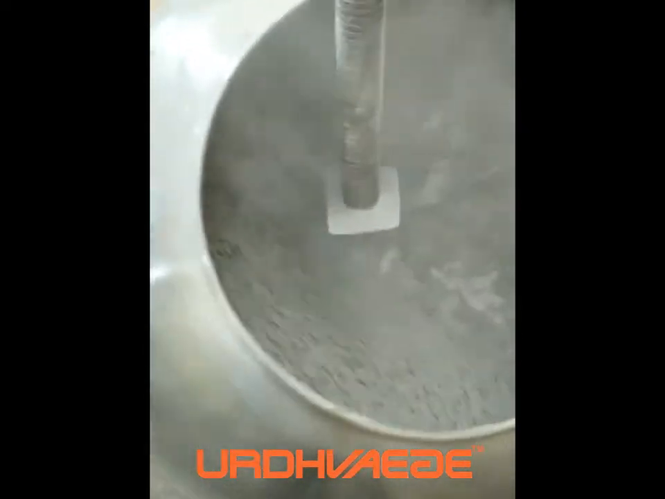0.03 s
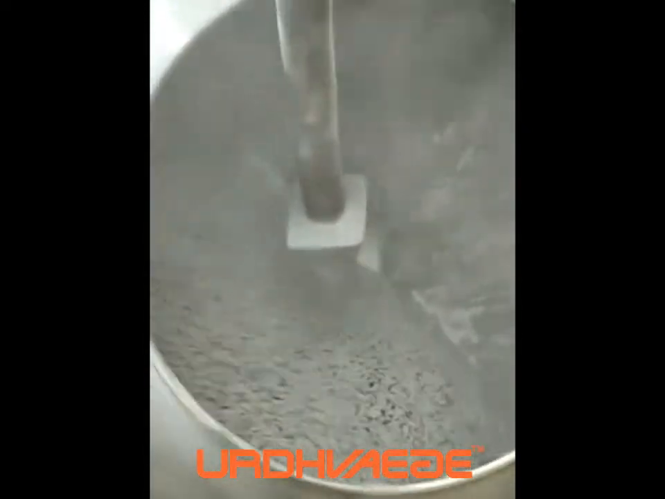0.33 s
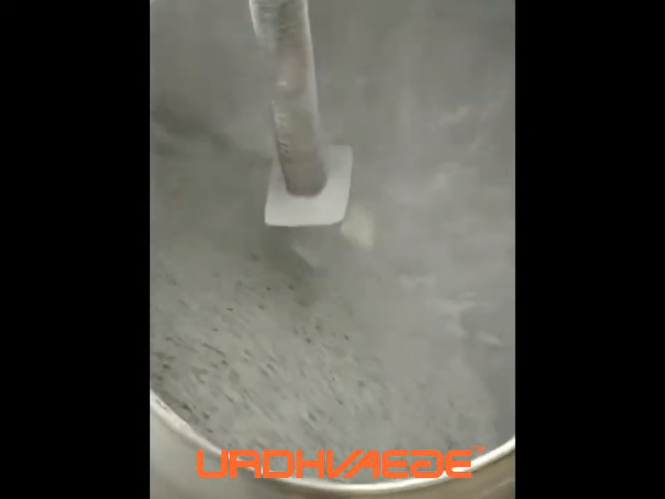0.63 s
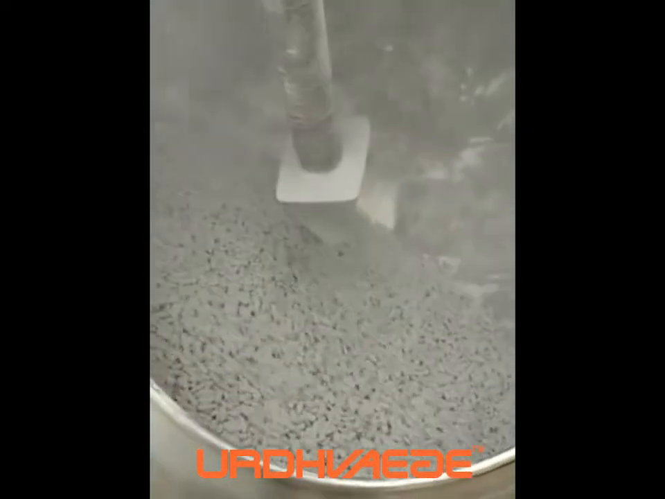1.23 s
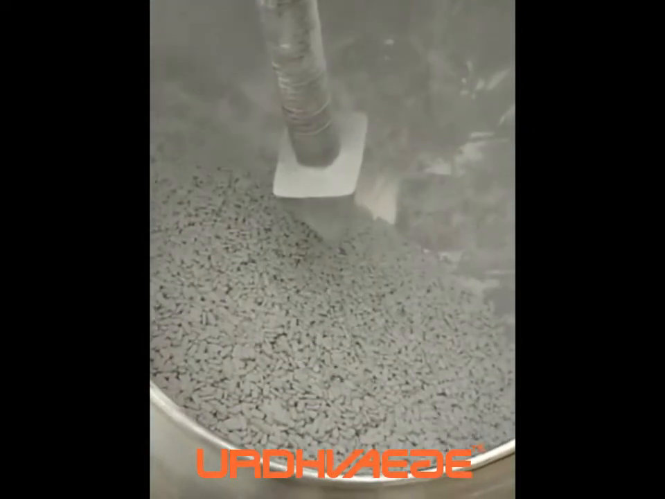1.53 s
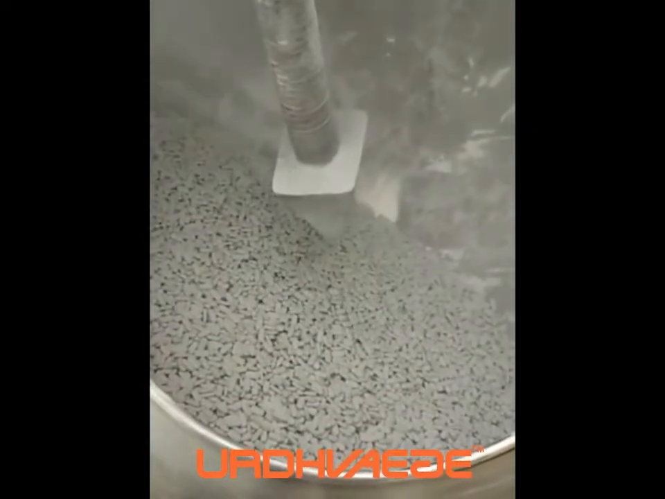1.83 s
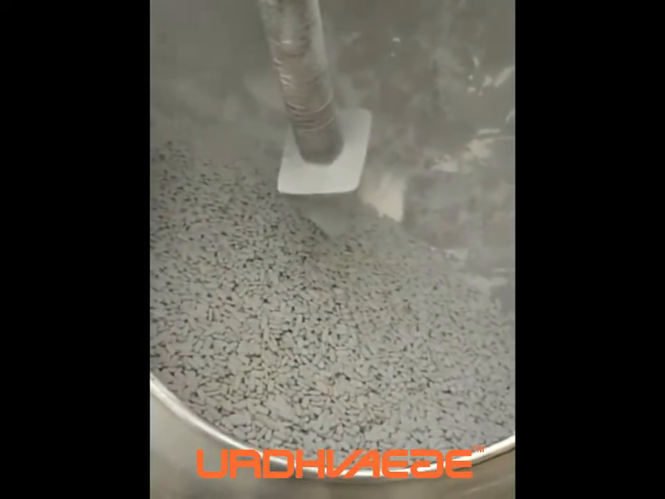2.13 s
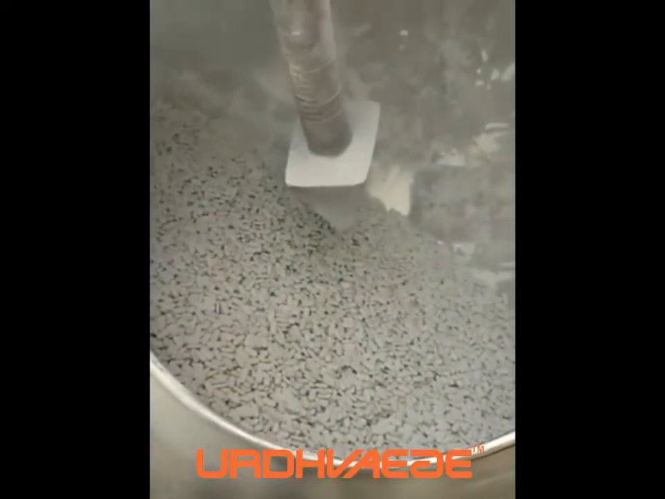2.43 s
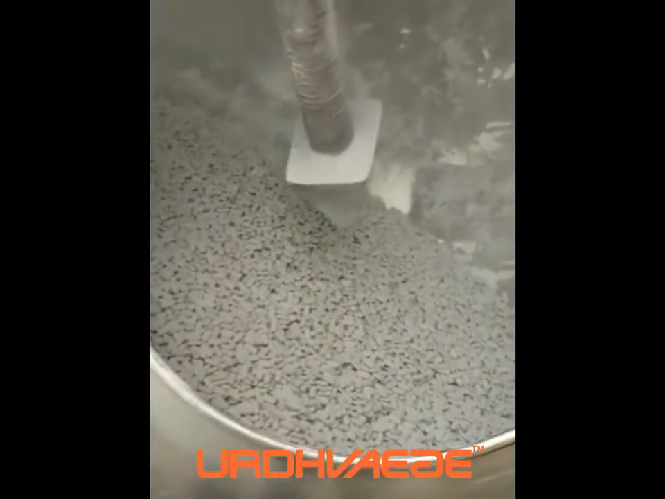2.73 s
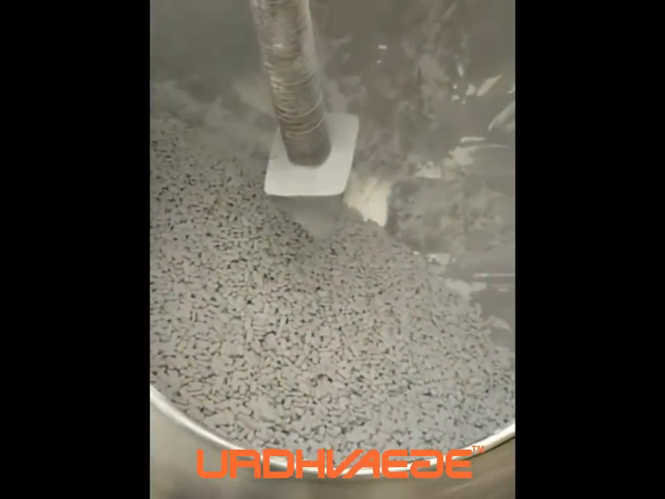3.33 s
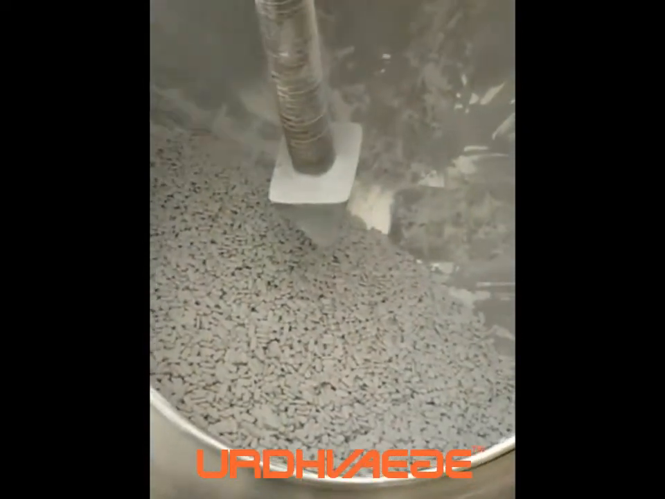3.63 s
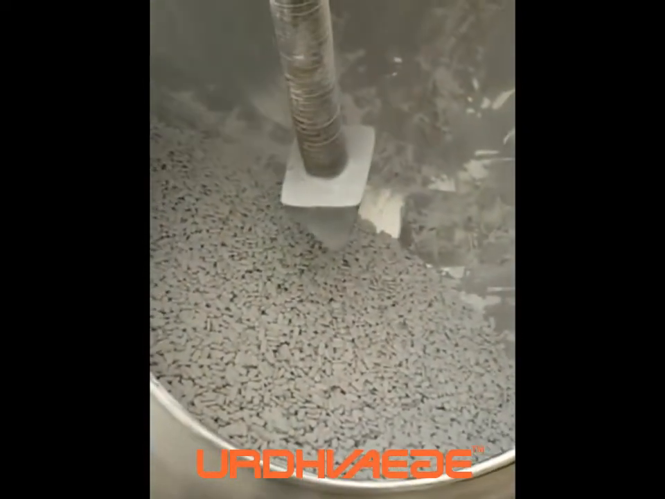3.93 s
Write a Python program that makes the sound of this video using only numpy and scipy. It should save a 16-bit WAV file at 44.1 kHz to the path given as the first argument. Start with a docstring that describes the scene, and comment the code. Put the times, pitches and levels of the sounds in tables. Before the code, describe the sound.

Steady hum and blower drone of a turning pan machine, pellets tumbling, spray hissing at first.

```python
"""A factory, at the mouth of a turning steel coating pan. The motor hums, the belt drive throbs,
a blower drones and its ducts rumble. Tumbling pellets rustle and excite the drum's air resonances.
A spray jet hisses into the pan for the first second and spits once more near the end.
At first the microphone moves in over the rim, where the air sounds hollow."""
import sys
import numpy as np
from scipy.fft import rfft, irfft, next_fast_len
from scipy.io import wavfile
from scipy.ndimage import map_coordinates

SR = 44100
rng = np.random.default_rng(int(sys.argv[2]) if len(sys.argv) > 2 else 0)


def store_pcm(level_fs):
    """Save levels as 16-bit WAV."""
    pcm = np.round(np.clip(level_fs, -1, 1) * 32767).astype(np.int16)
    wavfile.write(sys.argv[1], SR, np.atleast_2d(pcm).T)


N = 176400


def amp(db):
    """Decibels to gain."""
    return 10 ** (np.asarray(db) / 20)


def unit(x):
    """Scale to rms 1."""
    return x / np.sqrt(np.mean(x ** 2) + 1e-20)


def seconds():
    """Time of each sample."""
    return np.arange(N) / SR


def along(points, hz):
    """Interpolate (freq_hz, value) points on a log axis."""
    freq_hz, values = np.transpose(points)
    return np.interp(np.log(hz + 1), np.log(freq_hz + 1), values)


def curve(points):
    """Interpolate (time_s, value) points per sample."""
    return np.interp(seconds(), *np.transpose(points))


def wobble(rate_hz):
    """Smooth random curve, rate_hz knots a second."""
    return map_coordinates(rng.standard_normal(512), [seconds() * rate_hz], mode="mirror")


def bump(crest_s, sigma_s):
    """Gaussian envelope, peak 1."""
    return np.exp(-((seconds() - crest_s) / sigma_s) ** 2 / 2)


def filtered(x, response):
    """Apply a frequency response by FFT."""
    size = next_fast_len(N + SR // 2)
    return irfft(rfft(x, size) * response(np.fft.rfftfreq(size, 1 / SR)), size)[..., :N]


def resonance(f, centre_hz, width_hz):
    """Squared band-pass response: steep skirts."""
    return np.abs(f * width_hz / (centre_hz ** 2 - f * f + 1j * f * width_hz)) ** 2


def spread(pair, colour):
    """Two independent signals to a coloured stereo field, rms 1: bass alike, treble diffuse."""
    # left-right likeness: freq_hz, correlation
    likeness = [(90, 1), (200, 0.89), (380, 0.8), (480, 0.16), (650, 0.7), (850, 0.41), (1300, -0.2),
                (2000, 0.086), (4000, -0.023)]

    def mid_side_gains(f):
        angle = np.arccos(np.clip(along(likeness, f), -1, 1)) / 2
        return colour(f) * np.array([np.cos(angle), np.sin(angle)])

    mid, side = filtered(pair, mid_side_gains)
    return unit(np.array([mid + side, mid - side]))


def white():
    """Two independent white noises."""
    return rng.standard_normal((2, N))


def shaped(pair, spectrum):
    """Stereo field with a (freq_hz, density_db) spectrum, rms 1."""
    return spread(pair, lambda f: amp(along(spectrum, f)))


def tone(hz, stereo_rad, wander_hz=0.15):
    """Slightly unsteady sine, rms 1, with stereo_rad of phase between the ears."""
    phase = 2 * np.pi * (np.cumsum(hz + wander_hz * wobble(12)) / SR + rng.random())
    return np.sqrt(2) * np.sin(phase + np.array([[stereo_rad], [-stereo_rad]]) / 2)


def impacts(per_s, scatter_db):
    """Two independent streams of tiny random impacts, rms 1."""
    hits = rng.random((2, N)) < per_s / SR
    size = amp(scatter_db * np.clip(rng.standard_normal((2, N)), -2, 2))
    return unit(hits * np.sign(rng.standard_normal((2, N))) * size)


def rim_shadow():
    """Gain on tones that the rim screens until the microphone has moved in."""
    start_db, decay_s = -4.5, 0.38
    return amp(start_db * np.exp(-seconds() / decay_s))


def sizzle():
    """A faint, uneven high sizzle comes and goes once."""
    # sizzle spectrum: freq_hz, density_db
    spectrum = [(8000, -23), (10500, -4.5), (11500, 3), (12500, -11), (15500, -18)]
    return amp(-70 + 2 * wobble(20)) * bump(crest_s=2.75, sigma_s=0.2) * shaped(white(), spectrum)


def air_swells():
    """Hollow bands of air noise come and go in the pan's mouth."""
    # air swells: crest_s, sigma_s, centre_hz, width_hz, level_db
    swells = [(0.033, 0.033, 133, 45, -24.5), (0.158, 0.039, 133, 37, -23), (0.137, 0.0264, 267, 80, -22.5),
              (0.094, 0.19, 642, 172, -28), (0.146, 0.068, 814, 170, -29), (0.325, 0.12, 420, 120, -27),
              (0.368, .04, 1030, 300, -31), (.55, .03, 350, 50, -26), (0.6, 0.21, 450, 150, -30.5),
              (3.304, 0.089, 936, 81, -31), (3.82, 0.13, 906, 52, -37.5), (3.89, 0.045, 370, 74, -25.5)]
    band = lambda hz, width_hz: spread(white(), lambda f: resonance(f, hz, width_hz))
    return sum(amp(db) * bump(crest_s, sigma_s) * band(hz, width_hz)
               for crest_s, sigma_s, hz, width_hz, db in swells)


def motor():
    """Hum at mains harmonics, wavering in level."""
    # hum partials: harmonic, level_db, stereo_rad
    partials = [(1, -35, 0.5), (4, -39.5, 0.1), (6, -39.5, 0.84), (9, -37, 1.5), (10, -39, 1.44),
                (11, -44.5, -1), (12, -48, 2), (14, -41, 2)]
    mains_hz, waver_db = 49.65, 1.46
    return sum(amp(db + waver_db * wobble(8)) * tone(harmonic * mains_hz, stereo_rad)
               for harmonic, db, stereo_rad in partials)


def belt_drive():
    """Tones swell once per belt turn, no two turns quite alike."""
    # drive tones: pitch_hz, relative_db, throb_depth, first_crest_s, stereo_rad
    partials = [(347.4, -30.8, .62, .06, .4), (393.1, -35.5, .8, .03, .28)]
    turns_per_s, rise_db_per_s = 3.865, 0.26
    t = seconds()
    tones = 0
    for hz, db, depth, crest_s, stereo_rad in partials:
        throb = 1 + depth * np.cos(2 * np.pi * turns_per_s * (t - crest_s))
        tones += amp(db + 0.98 * wobble(5.01)) * throb * tone(hz, stereo_rad)
    return amp(-0.5 + rise_db_per_s * t) * rim_shadow() * tones


def blower():
    """Throbbing drone, steady whines, a wavering whistle and the rumble of duct air."""
    # drone envelope: time_s, relative_db
    throb = [(0.03, -27), (0.06, -25), (0.35, -45), (0.49, -28), (0.55, -40), (0.73, -24.5), (0.8, -38),
             (0.86, -26), (0.96, -37), (1.23, -22), (1.36, -28), (1.43, -21), (1.5, -26), (1.58, -19),
             (1.75, -38), (1.81, -22.5), (1.87, -33), (2.23, -20.5), (2.38, -27.5), (2.45, -21.5),
             (2.58, -29.5), (2.67, -25.5), (3.03, -39.5), (3.27, -19.5), (3.36, -36), (3.45, -20),
             (3.54, -35), (3.69, -20.5), (3.78, -37.5), (3.85, -20.5), (3.91, -35), (3.96, -19),
             (3.97, -23.5)]
    # blower and drive whines: pitch_hz, level_db, stereo_rad
    partials = [(182.8, -39.5, .2), (274.1, -36.5, .22), (376.1, -32, .4), (425.7, -49, .4),
                (475.2, -48, .8)]
    # duct air spectrum: freq_hz, density_db
    duct_spectrum = [(20, -14.5), (40, -9), (56, -7.5), (72, 2.5), (83, 8), (106, -3.5), (135, 3),
                     (200, -2), (225, -2.5), (255, 2.5), (310, -2.5), (385, -2.5), (470, -3.5), (600, -6.5),
                     (780, -13.5), (1100, -18), (2500, -67)]
    drone_gain = amp(-2) * curve([(time_s, amp(db)) for time_s, db in throb])
    drone = drone_gain * tone(hz=91.4, stereo_rad=0.1, wander_hz=0.99)
    whines = sum(amp(db + 0.1 * wobble(9)) * tone(hz, stereo_rad) for hz, db, stereo_rad in partials)
    whistle = amp(-43 + 2 * wobble(8.3)) * tone(hz=942.5, stereo_rad=0.56, wander_hz=2.5)
    rumble = amp(-26.5 + 0.3 * wobble(5.2)) * shaped(white(), duct_spectrum)
    return drone + rim_shadow() * (whines + whistle) + rumble


def drum():
    """The tumbling load keeps the drum's air resonances sounding."""
    # air modes: centre_hz, width_hz, relative_db
    modes = [(477, 7.6, -2), (660, 46, -9.5), (900.5, 30, 1), (948, 36, 0), (992, 27, -.5), (1030, 40, -6),
             (1098, 22, 1), (1203, 24, -11.5), (1490, 210, -8.5), (2130, 150, -12), (2470, 68, -17.5)]
    response = lambda f: sum(amp(db) * resonance(f, hz, width_hz) for hz, width_hz, db in modes)
    ring = spread(white(), response)
    return amp(-33.5 + 1.5 * wobble(6.85)) * ring


def pellets():
    """Thousands of tiny collisions a second merge into a rustle."""
    # rolling pellet spectrum: freq_hz, density_db
    spectrum = [(200, -33), (700, -2), (1300, 3), (1800, -3.5), (2400, -1), (3300, -7), (4200, -11.5),
                (4700, -17), (5500, -15), (6500, -22), (7600, -32.5), (9800, -39.5), (12000, -66),
                (15500, -62)]
    collisions = impacts(per_s=3500, scatter_db=2.5) + white()
    return amp(-29 + 0.26 * wobble(4.72)) * shaped(collisions, spectrum)


def spray():
    """The jet hisses and throws droplets in spurts, then dies away as the valve shuts."""
    # droplet spectrum: freq_hz, density_db
    droplet_spectrum = [(2500, -14), (4000, -2.5), (5800, 2.5), (7000, 5), (8200, -4), (10000, -9),
                        (11200, -13), (14000, -19), (15800, -28)]
    # droplet spurts: crest_s, sigma_s, level_db
    spurts = [(.03, .02, -43), (.09, .03, -55), (.31, 0.017, -45.5), (.385, 0.02, -48.5), (.485, .025, -49),
              (.58, .012, -53.5), (0.64, .024, -43), (.705, .014, -48.5), (0.822, 0.014, -43),
              (0.988, .06, -56)]
    # jet spectrum: freq_hz, density_db
    jet_spectrum = [(300, -20), (800, -7), (1500, 0), (2700, -2), (3900, -7.5), (4700, -15.5),
                    (5600, -18.5), (7000, -27), (8500, -36.5), (11000, -43), (14000, -43), (15800, -67)]
    # jet envelope: time_s, relative_db
    jet_envelope = [(0, -25), (.12, -27.5), (.26, -30), (.45, -26.5), (.63, -26.5), (.78, -26.5),
                    (.93, -31), (1.05, -31), (1.2, -36), (1.45, -42), (1.9, -65)]
    jet_gain_db, flutter_db = 3, 1
    droplets = shaped(impacts(per_s=3300, scatter_db=4.5), droplet_spectrum)
    spurt_gain = sum(amp(db) * bump(crest_s, sigma_s) for crest_s, sigma_s, db in spurts)
    jet_db = curve(jet_envelope) + jet_gain_db + flutter_db * wobble(25)
    return spurt_gain * droplets + amp(jet_db) * shaped(white(), jet_spectrum)


def spit():
    """One gritty puff of droplets from the nozzle lingers briefly in the drum."""
    # puff spectrum: freq_hz, density_db
    spectrum = [(800, -24), (2000, -2), (2800, 4), (3700, -1.5), (4600, -18), (5600, -7), (6700, -16),
                (9200, -25), (10200, -37), (14500, -32), (15800, -51)]
    crest_s, tail_relative_db, t60_s = 3.812, -9.5, 0.45
    age_s = seconds() - crest_s
    droplets = shaped(impacts(per_s=3000, scatter_db=4.5), spectrum)
    puff = bump(crest_s, sigma_s=0.015) * droplets
    tail_gain = (age_s > 0) * amp(tail_relative_db - 60 * np.abs(age_s) / t60_s)
    return amp(-29) * (puff + tail_gain * shaped(white(), spectrum))


def scene():
    """All sources sound through the pan's mouth, which favours one ear or the other by frequency."""
    # stereo balance: freq_hz, left_minus_right_db
    balance = [(45, -0.5), (100, 1.5), (220, .5), (380, -1.5), (560, 2.5), (760, 2.5), (1030, -2),
               (1450, -1), (2600, -1), (3700, 3), (5500, -0.5), (7500, -0.5), (10000, -8.5), (13000, 2)]
    machine = motor() + belt_drive() + blower() + drum() + pellets()
    mix = machine + spray() + spit() + sizzle() + air_swells()
    return filtered(mix, lambda f: amp(np.array([[1], [-1]]) * along(balance, f) / 2))


def record(dry):
    """Microphone: one narrow notch and a hard band limit."""
    notch_hz, sigma_hz, notch_db, top_hz = 4830, 26, -20, 15700
    notch = lambda f: amp(notch_db * np.exp(-((f - notch_hz) / sigma_hz) ** 2 / 2))
    return filtered(dry, lambda f: notch(f) * (f < top_hz))


dry = scene()
out = record(dry)
store_pcm(out)
```